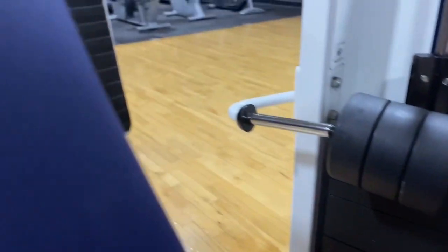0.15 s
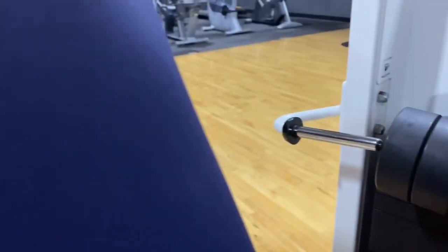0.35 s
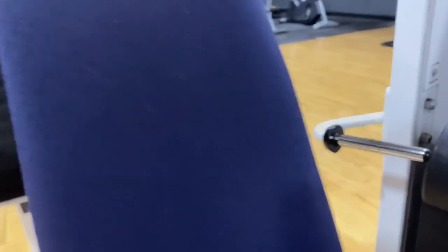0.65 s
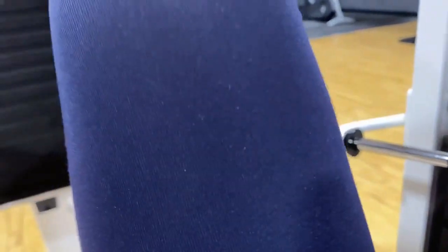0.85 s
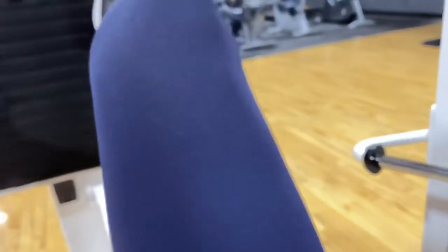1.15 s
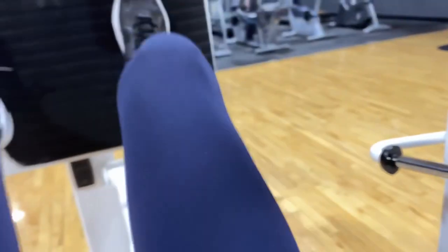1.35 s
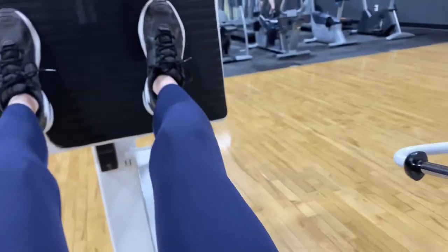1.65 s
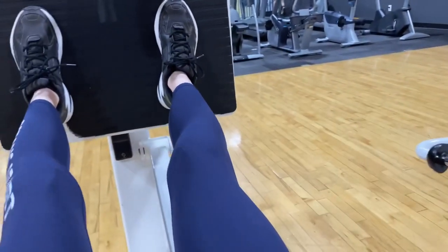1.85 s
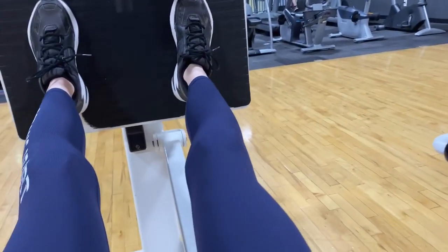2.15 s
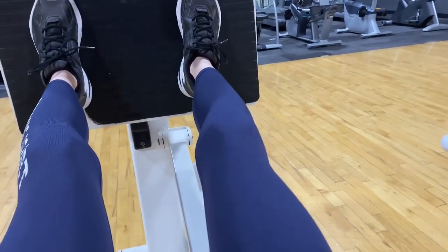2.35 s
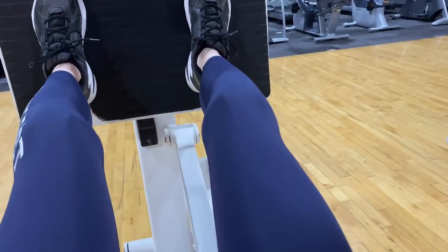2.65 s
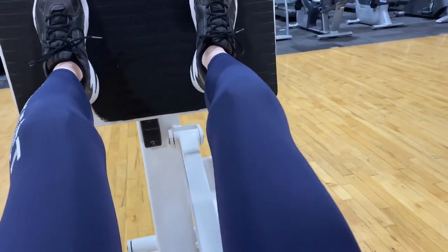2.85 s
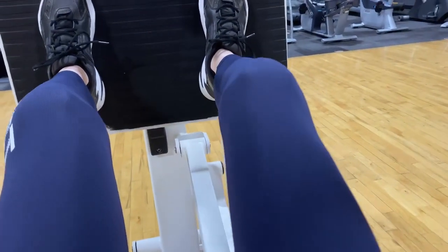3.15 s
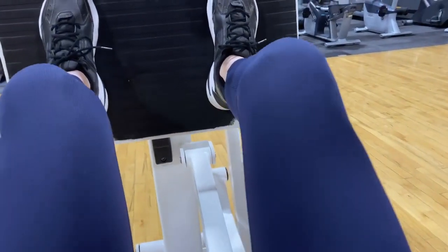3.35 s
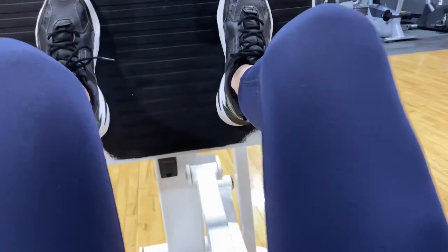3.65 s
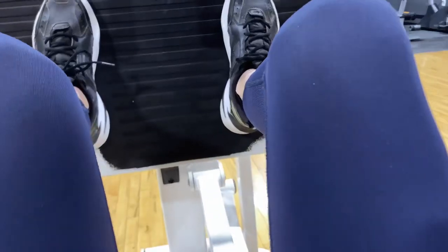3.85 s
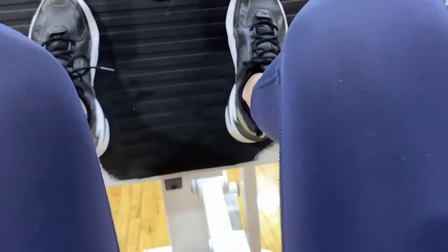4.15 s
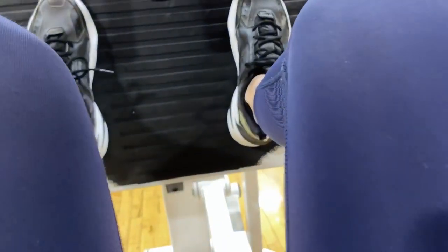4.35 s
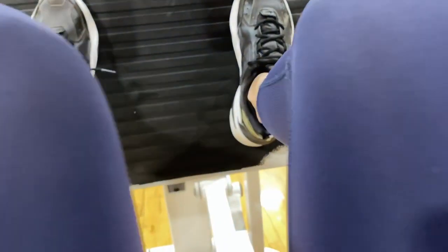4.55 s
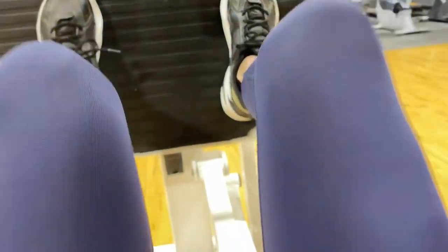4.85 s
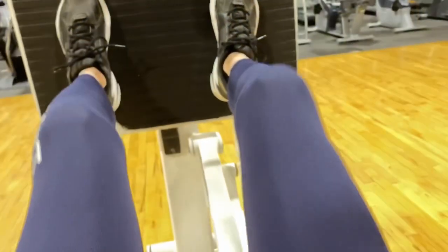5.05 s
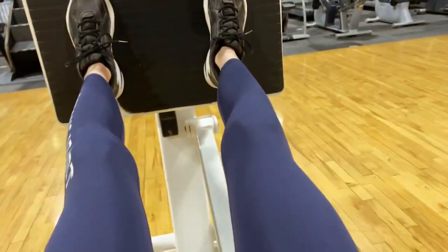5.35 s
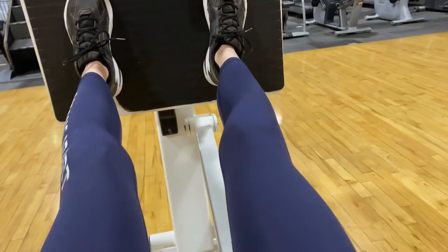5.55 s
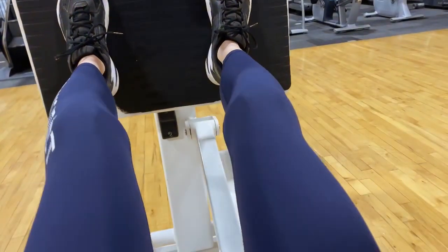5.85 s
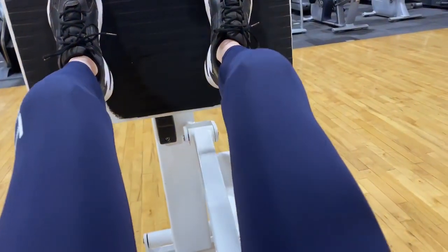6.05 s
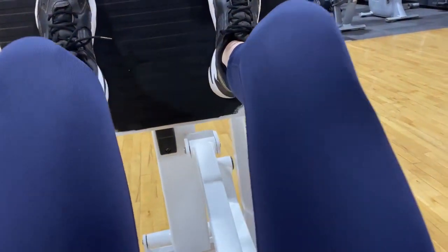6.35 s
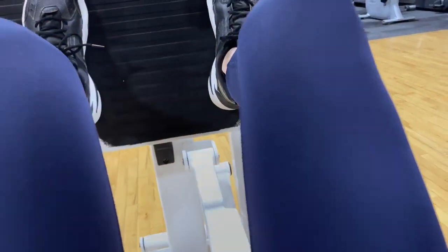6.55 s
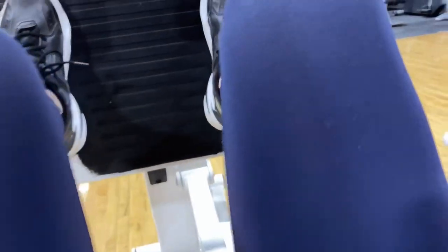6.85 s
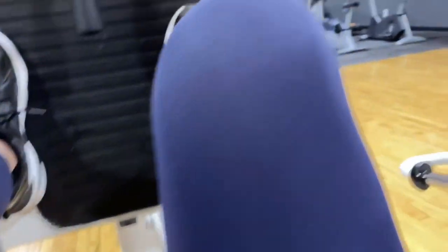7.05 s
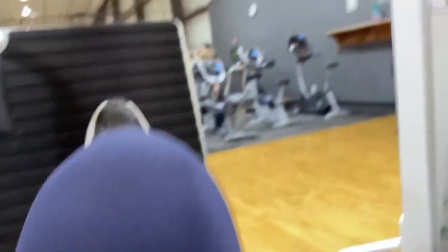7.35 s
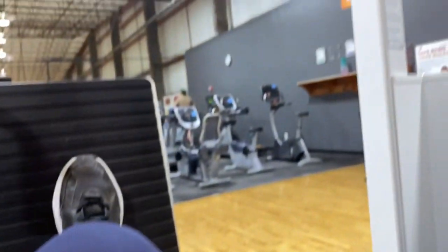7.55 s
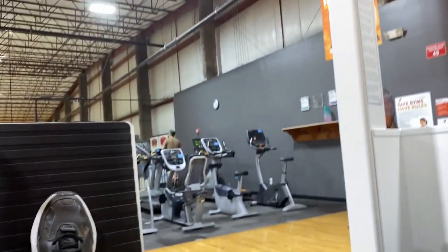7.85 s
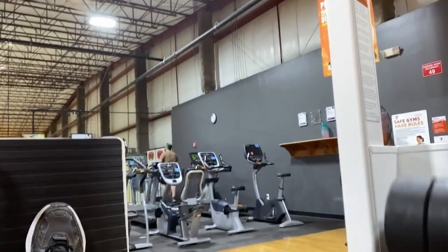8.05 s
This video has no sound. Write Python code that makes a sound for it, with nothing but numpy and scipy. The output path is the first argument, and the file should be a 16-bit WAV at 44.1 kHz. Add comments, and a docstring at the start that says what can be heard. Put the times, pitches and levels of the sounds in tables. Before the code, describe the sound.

Steel weight plates clink and chatter on a leg press, with rumbling carriage, dull thumps and brief pulley squeaks in a humming gym hall.

```python
"""Leg press in a gym hall

The machine is heard from its seat through two microphone ports, with an echo and the hiss and hum of fans.
Steel plates clink and chatter on their rods: short bursts of noise set groups of decaying tones ringing.
The carriage rumbles (low, uneven noise) and thumps (short tones that sink in pitch).
Knocks of the sled make the frame ring, blows make the guide rods sing, and a pulley squeaks with
sliding tones. There is also a thin hiss at the start."""
import sys
import numpy as np
from scipy import signal
from scipy.fft import rfft, irfft
from scipy.io import wavfile
from scipy.ndimage import uniform_filter1d

SR = 44100
rng = np.random.default_rng(int(sys.argv[2]) if len(sys.argv) > 2 else 0)


def boost(x):
    """Linear amplitude factor 10**(x/20) for a level x in decibels (scalar or array-like)."""
    u = np.asarray(x, float) / 20
    return 10 ** u


def unload_wav(signal):
    """Save mono or channel-first audio to the path in sys.argv[1] as 16-bit WAV at rate SR, clipped to [-1, 1]."""
    wavfile.write(
        sys.argv[1],
        SR,
        np.round(np.clip(np.atleast_2d(signal).T, -1, 1) * 32767).astype(np.int16),
    )


N = 361708

# Loudness of the hall hiss across pitch, as a shape only: (frequency [Hz], relative level [dB per Hz])
HALL_SHAPE = [(25, -30), (64, -17), (120, -12), (250, -15.5), (500, -5), (1000, -9), (2000, -7),
              (4000, -12.5), (6000, -18), (7500, -16), (10000, -25.5), (12000, -27.5), (13000, -27),
              (16000, -47)]
# Motor tones in the hall: (frequency [Hz], level [dB], width [Hz])
HUM_TONES = [(127.5, -48, 11), (366.8, -44.5, 14.8), (561.5, -54, 9.1), (811.4, -42, 2.7),
             (1208, -41.5, 7.6)]
# How alike the hall hiss is on the two sides: (frequency [Hz], likeness [0-1])
HALL_LIKENESS = [(60, 1), (300, 0.84), (800, 0.08), (1700, 0.24), (3000, 0.46), (6000, 0), (7000, 0.99),
                 (8200, 1), (9000, 0.1), (10000, 1)]
# The thin hiss: (start [s], end [s], frequency [Hz], width [Hz], level [dB])
THIN_HISS = (0, .26, 4902, 250, -48)
# Rolling of the carriage: (time [s], deep rumble [dB], upper rumble [dB])
ROLLING = [(0.0, -39, -35.5), (0.77, -36.5, -33.5), (1.32, -34.5, -36.5), (2.01, -30.5, -29),
           (2.24, -58, -37), (2.74, -73, -41.5), (3.31, -24.5, -26.5), (3.83, -45.5, -50),
           (4.29, -68, -42.5), (4.7, -42.5, -33), (5.04, -36, -31), (5.34, -49, -39.5), (5.75, -62, -35.5),
           (6.03, -33.5, -33.5), (6.42, -41, -33.5), (6.81, -26, -29), (7.67, -64, -39.5), (8.2, -39, -36)]
# Clinks of the plates: (time [s], low tones [dB], middle tones [dB], high tones [dB], singing tone [dB])
PLATE_CLINKS = [(0.295, -26.5, -60, -69, -64), (0.3997, -27.5, -36, -27, -40), (0.42, -23, -34, -27, -36),
                (0.697, -41, -35, -35, -40), (1.1191, -12, -21.5, -15.5, -16.5),
                (1.261, -20, -44, -36, -25), (1.3078, -20, -26, -24, -19), (1.325, -31, -30, -31, -26),
                (1.3558, -28, -44, -27.5, -43), (1.557, -28, -30, -29, -42), (1.6254, -29, -37, -36.5, -43),
                (1.669, -23.5, -28, -34, -53), (2.1031, -25.5, -62, -42, -52),
                (2.5347, -19.5, -35, -36, -44), (2.548, -25, -34, -36, -50), (2.578, -27.5, -37, -40, -55),
                (2.797, -22, -61, -48, -60), (2.8891, -25, -40, -50, -53), (2.929, -24.5, -39, -43, -55),
                (2.9718, -27.5, -39, -44, -44), (3.146, -26, -48, -53, -50), (3.191, -16, -35, -39, -22.5),
                (3.3597, -19, -32, -28, -32), (3.39, -20, -32, -31.5, -42), (3.436, -17, -30, -33, -28),
                (3.5995, -20.5, -42, -35, -34.5), (3.6816, -25.5, -34, -34, -38),
                (4.4688, -41, -45, -63, -63), (4.529, -52, -38, -39.5, -52), (4.7749, -30, -48, -51, -52),
                (4.793, -43, -45, -36, -32), (4.8367, -21, -20.5, -15.5, -16.5),
                (4.851, -22, -28, -29, -28), (4.881, -19, -40, -25, -36), (4.9355, -19.5, -47, -34, -27),
                (4.959, -28, -36, -29, -29), (4.976, -35, -40, -40, -21), (4.9911, -19.5, -35, -30, -25),
                (5.0374, -24, -45, -43, -54), (5.129, -23.5, -30.5, -39, -39),
                (5.309, -40, -33.5, -40.5, -48), (5.7986, -20, -33, -36.5, -42),
                (5.816, -20, -35, -48, -43), (5.965, -16.5, -36, -31, -39), (5.996, -22, -46, -36.5, -52),
                (6.1688, -20, -49, -40, -33), (6.2064, -15.5, -30, -25.5, -24.5),
                (6.3479, -22.5, -33, -29, -22.5), (6.418, -18, -33, -31, -22),
                (6.565, -20.5, -37, -34, -39), (6.636, -14.5, -29, -27, -29),
                (7.1306, -15, -16.5, -25.5, -32), (7.2045, -13.5, -29, -23, -18.5),
                (7.251, -24, -29, -27.5, -41), (7.732, -30, -35, -35, -32.5),
                (7.793, -19, -21.5, -20, -20.5), (7.9583, -16.5, -47, -27.5, -23.5),
                (8.0156, -21.5, -33, -24, -41), (8.124, -18, -51, -22.5, -24.5)]
# Tones (modes) in which a plate rings: (frequency [Hz], relative level [dB], time to fall 60 dB [s])
PLATE_MODES = [(1584.5, 5.5, 0.27), (1590, -5, 0.41), (1667, 15, 0.11), (1690, 2, 0.33), (1728, 2.5, 0.089),
               (1883, -8, 0.3), (2213, -1, 0.097), (2454, 0.5, 0.079), (2904, -0.5, 0.13),
               (3145, 11, 0.038), (3310, 5, 0.071), (3500, 7.5, 0.054), (3937, 13, 0.046),
               (4340, 0.5, 0.052), (4570, 0, 0.16), (4860, 6.5, 0.024), (5640, -2.5, 0.07), (5870, 0, 0.09)]
# Borders between the low, middle and high plate tones: (frequency [Hz])
FAMILY_BORDERS = [2400, 3700]
# Range that holds the singing tone, the strongest high one: (lowest [Hz], highest [Hz])
SINGING_RANGE = (4450, 4650)
# Noisy crunch compared with the low, middle, high and singing tones in turn: (level [dB])
CRUNCH_LEVELS = [-5.5, -0.5, -3, -11]
# Short ringing of a clink's bright edge: (frequency [Hz], level [dB], time to fall 60 dB [s])
EDGE_MODES = [(9600, -15, .014), (11000, -16, .014)]
# Sharp snaps without a pitch: (time [s], level [dB])
SHARP_SNAPS = [(0.392, -32), (0.4, -22.5)]
# Heaviest carriage thumps: (time [s], peak [dB], settled pitch [Hz], snap compared with the peak [dB])
HEAVY_THUMPS = [(0.384, -19.5, 116, -8), (1.742, -14, 220, -11), (1.828, -20, 97, -12),
                (1.895, -11, 102.2, -13), (1.97, -16, 120, -17), (2.05, -11.5, 99, -18),
                (2.063, -11, 62, -30), (2.14, -13.5, 104, -26), (3.083, -13, 76, -12),
                (3.113, -19, 152, -2), (3.15, -23.5, 149, -2), (3.207, -18, 182, 2), (3.268, -23, 120, -1),
                (3.297, -20, 111, 9.5), (3.548, -27, 129, 5), (6.569, -15, 167, -10),
                (6.593, -12.5, 207, -2), (6.622, -13, 92, -6), (6.64, -17, 100, 1.5), (6.714, -16.5, 95, 5),
                (6.74, -14, 66, -6), (7.046, -22, 98, -9)]
# Spells of lighter thumps: (start [s], end [s], typical peak [dB], snap compared with the peak [dB])
JUDDER_SPELLS = [(1.651, 2.18, -21, -10.5), (3.101, 3.45, -26.5, -1.5), (6.774, 6.98, -27, 0.5)]
# Knocks of the sled on the frame: (time [s], near tubes [dB], far beams [dB])
SLED_KNOCKS = [(0.399, -34, -23), (4.4692, -25, -19), (7.128, -7.5, -9), (7.25, -25, -17)]
# Tones in which the frame rings: (frequency [Hz], relative level [dB], time to fall 60 dB [s])
FRAME_MODES = [(354.4, -4.5, 0.17), (355, -22.5, 2.2), (385, -22, 1.9), (541, -4, 0.068), (708, -7.5, 0.05),
               (797, -2, 0.028), (1860, 6.5, 0.033), (3200, 1, 0.041)]
# Bouts of plate chatter: (start [s], end [s], low tones [dB], high tones [dB], singing tone [dB])
CHATTER_BOUTS = [(1.05, 1.11, -30.5, -46, -46), (1.12, 1.3, -29.5, -35.5, -45),
                 (1.3, 1.42, -26, -38.5, -52), (1.45, 1.72, -31, -43, -58), (2.57, 2.6, -29, -41, -55),
                 (2.8, 3.05, -36, -57, -58), (3.02, 3.17, -43, -60, -58), (3.2, 3.62, -34.5, -45.5, -54),
                 (4.8, 5.05, -25.5, -35.5, -37.5), (5.06, 5.17, -36.5, -38.5, -41),
                 (5.81, 5.86, -31.5, -39.5, -52), (5.99, 6.1, -31, -50, -51), (6.22, 6.3, -27, -41, -45),
                 (6.39, 6.62, -28, -41, -40.5), (7.14, 7.3, -36, -32, -33.5), (7.83, 7.9, -26, -37, -45),
                 (7.99, 8.2, -27, -34, -36.5)]
# Blows that make the guide rods sing: (time [s], upper tone [dB], lower tone [dB])
BLOWS_ON_RODS = [(1.124, -47, -36), (1.1842, -33, -27), (1.2647, -25, -21), (1.3113, -31, -27),
                 (1.35, -25, -24), (1.61, -49, -20.5), (1.664, -36.5, -18), (3.37, -57, -22),
                 (4.776, -45, -22), (4.8827, -41, -24), (4.938, -31, -22), (6.349, -31, -23),
                 (6.421, -35.5, -35), (7.207, -28, -27)]
# The upper, then the lower rod tone: (frequency [Hz], time to fall 60 dB [s])
ROD_TONES = [(4549, 1.0), (2207, .2)]
# Pulley squeaks as the stack comes down: (start [s], end [s], starting pitch [Hz], level [dB])
PULLEY_SQUEAKS = [(3.192, 3.365, 1316, -29), (3.358, 3.378, 1275, -31), (3.486, 3.55, 1230, -29),
                  (6.215, 6.362, 1343, -25), (6.372, 6.4, 1290, -27), (6.451, 6.503, 1235, -25.5)]
# How far the left port is ahead of the right in phase: (frequency [Hz], lead [rad])
PORT_LEAD = [(0, 0), (690, -1.9), (1500, -2.9), (2050, -4.6), (2670, -4.0), (4650, -4.9), (5000, -5.9),
             (5600, -5.6), (6550, -3.5), (7000, -3.14), (8100, -3.1), (9730, 0), (11600, 0), (12500, 2.4),
             (16000, 3.9)]
# Left port level minus right port level: (frequency [Hz], difference [dB])
PORT_LEVELS = [(60, 3), (110, -1.5), (200, -1), (380, -3), (700, -3.5), (1290, 3), (2380, -1), (4400, -4),
               (8120, 3), (15000, -4)]
# Narrow treble dip in both ports: (centre [Hz], half width [Hz], depth [dB])
PORT_NOTCH = (7300, 700, -9)


def columns(table):
    """Join the points of a time table with straight lines, one curve per column."""
    s, *rest = np.transpose(table)
    return [np.interp(np.arange(N) / SR, s, c) for c in rest]


def on_log(table, hz):
    """Read a frequency table at hz, with equal musical steps equally far apart."""
    f, v = np.transpose(table)
    return np.interp(np.log(np.maximum(hz, 1)), np.log(f), v)


def unit(x):
    """Scale a sound to an average (rms) level of 1."""
    return x / np.sqrt(np.mean(x ** 2))


def early_unit(x):
    """Scale a sound so that its first 700 samples have an average (rms) level of 1."""
    return x / np.sqrt(np.mean(x[..., :700] ** 2))


def band(x, lo_hz, hi_hz):
    """Keep mainly the frequencies between two limits."""
    return signal.sosfilt(signal.butter(2, [lo_hz, hi_hz], "bandpass", fs=SR, output="sos"), x)


def ring(x, hz, t60):
    """Strike one mode with x: an impulse of 1 starts a dying tone of height 1."""
    r = np.exp(-np.log(1000) / (max(t60, .01) * SR))
    w = 2 * np.pi * hz / SR
    return signal.lfilter([0, np.sin(w)], [1, -2 * r * np.cos(w), r * r], x)


def walk(rate):
    """Wander at random with a spread of 1: values held for 1 / rate seconds, then smoothed twice."""
    k = int(SR / rate)
    held = np.repeat(rng.standard_normal(N // k + 1), k)
    return unit(uniform_filter1d(uniform_filter1d(held, k), k)[:N])


def add(out, s, shape):
    """Mix a short sound in at time s."""
    i = int(s * SR)
    out[..., i:i + shape.shape[-1]] += shape[..., :N - i]


def hall(level_db=-36):
    """Ventilation: noise partly alike left and right, plus motor tones made by ringing on noise."""
    hz = np.arange(N // 2 + 1) * SR / N
    alike = np.clip(on_log(HALL_LIKENESS, hz), 0, 1)
    noise = rfft(rng.standard_normal((2, N))) * boost(on_log(HALL_SHAPE, hz))
    mid, side = noise * np.sqrt([1 + alike, 1 - alike])
    hiss = boost(level_db + 0.43 * walk(5.8)) * unit(irfft([mid + side, mid - side], N))
    hum = sum(boost(db) * unit(ring(rng.standard_normal(N), f, 1.9 / width)) for f, db, width in HUM_TONES)
    return hiss + hum


def thin_hiss():
    """A narrow band of noise that holds steady and then fades over 60 ms."""
    start, stop, hz, width, db = THIN_HISS
    hiss = unit(band(rng.standard_normal(N), hz - width / 2, hz + width / 2))
    return boost(db) * hiss * np.interp(np.arange(N) / SR, [start, stop - .06, stop], [1, 1, 0])


def rolling(lumpy_db=2.0):
    """The rolling carriage gives low bands of noise with uneven levels, and the seat creaks along."""
    deep, upper = columns(ROLLING)
    out = boost(deep + lumpy_db * walk(23)) * unit(band(rng.standard_normal(N), 39.0, 104.4))
    out += boost(upper + lumpy_db * walk(35)) * unit(band(rng.standard_normal(N), 65, 174.6))
    creak = unit(band(rng.standard_normal(N), 162, 506))
    return out + boost(upper - 9.5 + 4.3 * walk(70)) * creak


def room(x, size=SR):
    """Hall echo: each side has its own decaying noise, in which the treble dies sooner."""
    t60_s = 0.94
    t = np.arange(size) / SR
    a, b = rng.standard_normal((2, 2, size)) * (t > .006)  # the echo starts after 6 ms
    tail = band(a, 44, 1900) * boost(-60 * t / t60_s)
    tail += .5 * band(b, 2900, 13000) * boost(-60 * t / (0.61 * t60_s))
    return signal.fftconvolve(x[None], tail / np.sqrt(np.sum(tail[0] ** 2)), axes=1)[:, :N]


def singing(hz):
    """Tell whether a plate tone is the singing one."""
    return (hz > SINGING_RANGE[0]) & (hz < SINGING_RANGE[1])


def contact(rows, fade_s, rise_s=0.001, tick=2.7, size=1800):
    """Blows with energy 1: a burst of noise with a first tick and a short scatter of rebounds."""
    t = np.arange(size) / SR
    c = rng.standard_normal((rows, size))
    c = c * np.sqrt(np.abs(c))  # makes the peaks stand out
    c = c * (1 - np.exp(-t / rise_s)) * (np.exp(-t / fade_s) + tick * np.exp(-t / 0.00036))
    return c / np.sqrt(np.sum(c ** 2, axis=1, keepdims=True))


def clinks(scatter_db=7.5, side_db=4.5, detune=0.0036, size=6000):
    """Each clink strikes another spot: the modes share it anew, with noisy crunch and a bright edge."""
    side_rad = .5  # each mode's phase shift: one way on the left, the other on the right
    close_s, close_db = 0.029, -8
    edge_db, edge_share = -23.5, 0.83  # edge offset, and dB gained per dB of the stronger treble level
    hz, db, t60 = np.transpose(PLATE_MODES)[:, :, None]
    family = np.searchsorted(FAMILY_BORDERS, hz[:, 0]) + singing(hz[:, 0])
    crunch_bands = [(1350, 1860), (2300, 2960), (3800, 9100), (4300, 4800)]  # Hz
    t, out, air = np.arange(size) / SR, np.zeros((2, N)), np.zeros(N)
    count = len(PLATE_CLINKS)
    spots = rng.standard_normal((count, 4, len(PLATE_MODES), 1))
    blows, crunches, snaps = (contact(count, fade_s) for fade_s in (.009, .014, .009))
    # the plates settle on each other and choke the ring, the singing mode least
    closing = boost(close_db / (1 + np.exp((close_s - t) / 0.015)))
    for (s, *levels), spot, blow, crunch, snap in zip(PLATE_CLINKS, spots, blows, crunches, snaps):
        strength, shift, lean, side = spot
        turn = 2 * np.pi * hz * (1 + detune * shift / (1 + 3 * singing(hz))) * t
        fade = boost(db + scatter_db * strength - 60 * t / t60)
        modes = np.array([fade * boost(k * side_db * lean) * np.sin(turn + k * side_rad * np.sign(side))
                          for k in (1, -1)])
        for f, level_db in enumerate(levels):
            tone = modes[:, family == f].sum(axis=1)
            tone = early_unit(signal.fftconvolve(tone, blow[None], axes=1)[:, :size])
            grit = early_unit(band(crunch, *crunch_bands[f]))
            tone[:, :len(grit)] += boost(CRUNCH_LEVELS[f]) * grit
            add(out, s, boost(level_db) * closing ** (.5 if f == 3 else 1) * tone)
        add(air, s, boost(edge_db + edge_share * max(levels[-2:])) * early_unit(snap))
    for (s, snap_db), snap in zip(SHARP_SNAPS, contact(len(SHARP_SNAPS), 0.0034)):
        add(air, s, boost(snap_db) * early_unit(snap))
    rings = sum(boost(g) * ring(air, f, d) for f, g, d in EDGE_MODES)
    out += band(rings, 3700, 12500)
    return out + 2 * band(air, 7100, 10300) + boost(7.0) * band(air, 8600, 16000)


def judder():
    """List light thumps at an uneven pace, each with its own pitch and size."""
    gap_s, pitch_hz, spread_octaves, scatter_db = .032, 100.5, 0.64, 2
    rows = []
    for start, stop, db, snap_db in JUDDER_SPELLS:
        for i, (delay, size, pitch) in enumerate(rng.standard_normal((18, 3))):
            s = start + gap_s * (i + .35 * delay)
            hz = pitch_hz * 2 ** (spread_octaves * np.clip(pitch, -1, 2))
            if s < stop:
                rows.append((s, db + scatter_db * size, hz, snap_db))
    return rows


def thumps(cycles=0.61, snap_hz=580, snap_fall=0.75):
    """Carriage thumps: a brief low tone, then a rough higher snap; both sink in pitch."""
    snap_s, snap_spread, rough_db = .0028, .2, 2.5
    t = np.arange(SR // 8) / SR
    late = np.maximum(t - .009, 0)  # the snap comes 9 ms later
    low_s = t + 0.0011 * (1 - np.exp(-t / 0.0039))  # stretched time makes the pitch start high
    snap_time_s = (1 - snap_fall) * late + snap_fall * 0.0056 * (1 - np.exp(-late / 0.0038))
    out, snaps = np.zeros((2, N))
    rows = HEAVY_THUMPS + judder()
    turns = rng.random((len(rows), 3)) * 2 * np.pi
    for (s, db, hz, snap_db), (a, b, c) in zip(rows, turns):
        u, v = t * hz / cycles, late / snap_s
        add(out, s, boost(db) * u * np.exp(1 - u) * np.sin(2 * np.pi * hz * low_s + a))
        sinking = snap_hz * (1 + snap_spread * np.cos(c)) * snap_time_s
        add(snaps, s, boost(db + snap_db) * v * np.exp(1 - v) * np.sin(2 * np.pi * sinking + b))
    return out + snaps * boost(rough_db * walk(350))


def frame(bounce_db=1):
    """Knocks ring the hollow steel: near tubes are hit twice, far beams answer late and waver."""
    bounce_s, far_late_s, far_hz, waver_db = .0111, .014, 450, 4  # modes below far_hz are far beams
    near, far = np.zeros((2, N))
    for s, near_db, far_db in SLED_KNOCKS:
        add(near, s, boost(np.array([near_db])))
        add(near, s + bounce_s, boost(np.array([near_db + bounce_db])))
        add(far, s + far_late_s, boost(far_db) * np.hanning(40) / 20)  # a softened push
    rung = np.zeros(N)
    for hz, db, t60 in FRAME_MODES:
        if hz < far_hz:
            rung += boost(db + waver_db * walk(28)) * ring(far, hz, t60)
        else:
            rung += boost(db) * ring(near, hz, t60)
    return band(rung, 290, 6900)


def bouts(table, rise_s, fall_db_s, rest_db):
    """Levels that climb the last 20 dB in rise_s before each bout, hold through it and then die away."""
    t = np.arange(N) / SR
    start, stop, *levels = np.transpose(table)[:, :, None]
    shape = np.minimum(0, np.minimum(20 * (t - start) / rise_s, -fall_db_s * (t - stop)))
    return [np.maximum(rest_db, (db + shape).max(axis=0)) for db in levels]


def chatter(density=.03, damped=0.5):
    """Dense small ticks of loose plates keep the plate modes sounding, now one, now another."""
    spike_db, wander_db, gust_db = 2.2, 4., 2.2
    low, high, sing = bouts(CHATTER_BOUTS, rise_s=0.072, fall_db_s=200, rest_db=-57.5)
    tick_db = spike_db * np.minimum(rng.exponential(size=N), 4) + gust_db * walk(40)
    ticks = rng.standard_normal((2, N)) * boost(tick_db) * (rng.random(N) < density)
    ticks = ticks[0] + .7 * ticks  # the two sides share many of their ticks
    parts = np.zeros((3, 2, N))  # low, high and singing tones
    for hz, db, t60 in PLATE_MODES:
        push = ticks * boost(db + wander_db / (1 + singing(hz)) * walk(10.0))
        parts[int(hz > FAMILY_BORDERS[0]) + int(singing(hz))] += ring(push, hz, damped * t60)
    grit = boost(low - 7.5) * unit(band(ticks, 1970, 2730))
    grit += boost(high - 1) * unit(band(ticks, 1700, 6300))
    grit += boost(high - 13.5) * unit(band(ticks, 10100, 10560))
    return boost(low) * unit(parts[0]) + boost(high) * unit(parts[1]) + boost(sing) * unit(parts[2]) + grit


def rods():
    """Drawn-out pushes make two thin rod tones swell in; they waver as the plates touch the rods."""
    swell_s, waver_db = .012, 3
    force, out = np.zeros((2, N)), np.zeros(N)
    for s, *levels in BLOWS_ON_RODS:
        add(force, s, boost(np.array(levels))[:, None])
    for push, (hz, t60) in zip(force, ROD_TONES):
        swell = ring(push, hz, swell_s * np.log(1000)) * 2 / (swell_s * SR)
        out += boost(waver_db * walk(30)) * ring(swell, hz, t60)
    return out


def squeaks(wobble_hz=8):
    """Dry friction in the pulley: a rough, wobbling tone that slides down during each squeak."""
    sag_hz_s, rough_db = 120, 2.5
    t, out = np.arange(N) / SR, np.zeros(N)
    for start, stop, hz, db in PULLEY_SQUEAKS:
        on = uniform_filter1d(1. * (t > start) * (t < stop), size=500)  # soft start and end
        pitch = hz - sag_hz_s * (t - start) + wobble_hz * walk(80)
        out += on * boost(db + rough_db * walk(41)) * np.sin(2 * np.pi * np.cumsum(pitch) / SR)
    return out


def scene():
    """Mix steel, echo, carriage and hall; all but the carriage drops in level just before the end."""
    room_db, fade_s, fade_db = -16, 8.157, -26
    steel = clinks() + chatter() + rods() + squeaks() + thin_hiss()
    knocks = frame()
    echo = boost(room_db) * room(steel.mean(axis=0) + .5 * knocks)
    whole = steel + echo + knocks + hall()
    drop = boost(np.interp(np.arange(N) / SR, [fade_s, fade_s + 0.0015], [0, fade_db]))
    return rolling() + thumps() + whole * drop


def roll_off(x):
    """The treble ends steeply here."""
    return signal.sosfilt(signal.butter(12, 16600, fs=SR, output="sos"), x)


def record(dry):
    """Two microphone ports differ in phase and level by frequency, share a dip and clip at full scale."""
    hz = np.arange(N // 2 + 1) * SR / N
    # half of the difference goes to the left port, the opposite half to the right
    half = boost(on_log(PORT_LEVELS, hz) / 2) * np.exp(.5j * np.interp(hz, *np.transpose(PORT_LEAD)))
    centre_hz, width_hz, depth_db = PORT_NOTCH
    dip = boost(depth_db * np.exp(-((hz - centre_hz) / width_hz) ** 2))
    ports = irfft(rfft(dry) * [half, 1 / half] * dip, N)
    mix = np.clip(ports, -1, 1)
    return roll_off(mix)


dry = scene()
out = record(dry)
unload_wav(out)
```